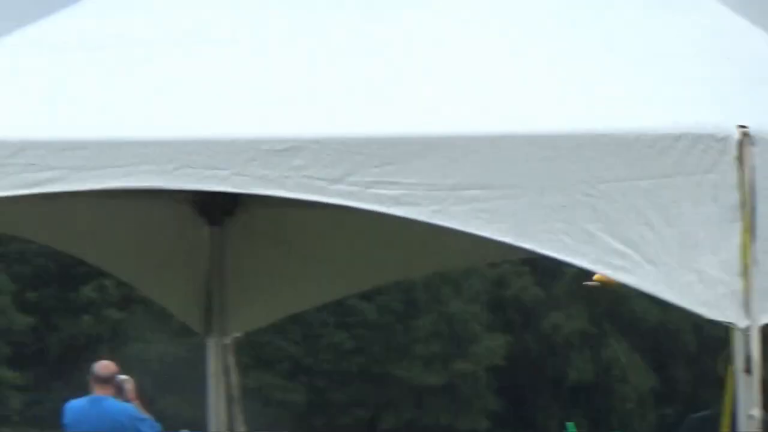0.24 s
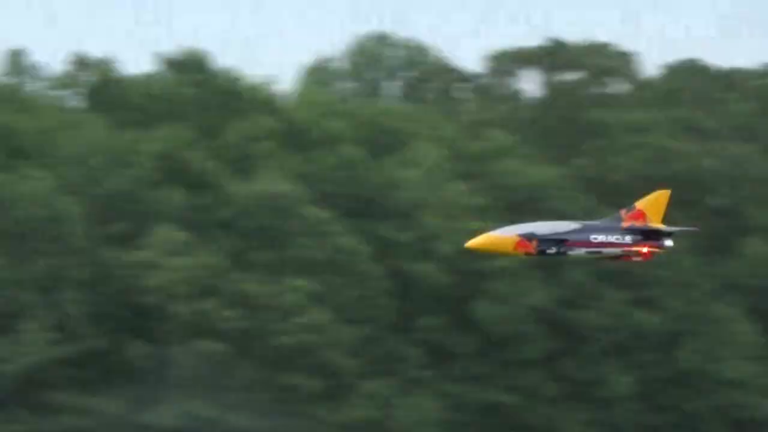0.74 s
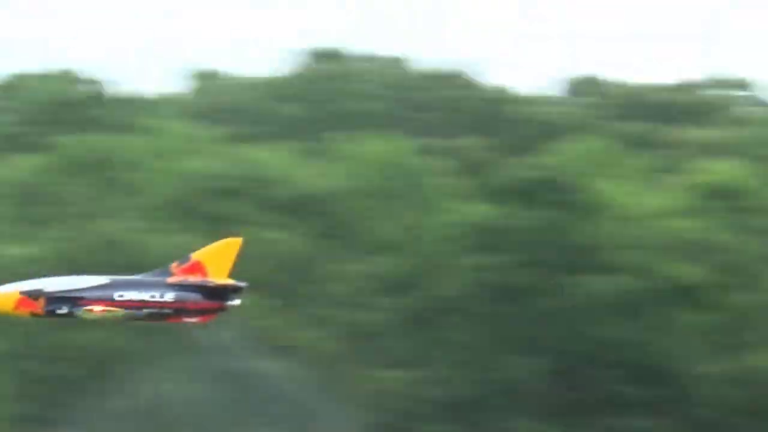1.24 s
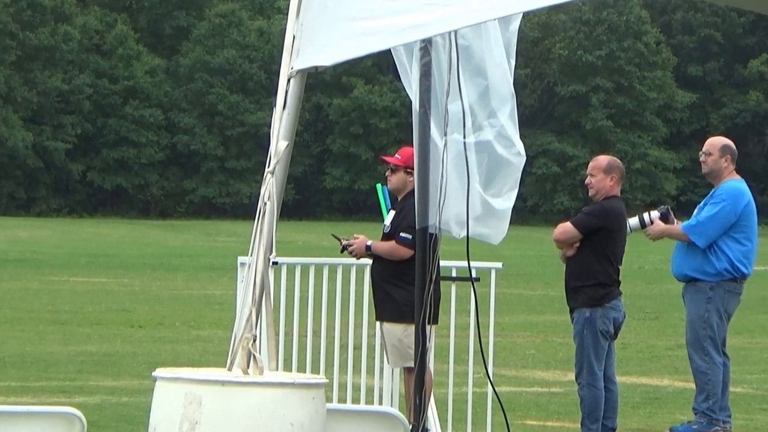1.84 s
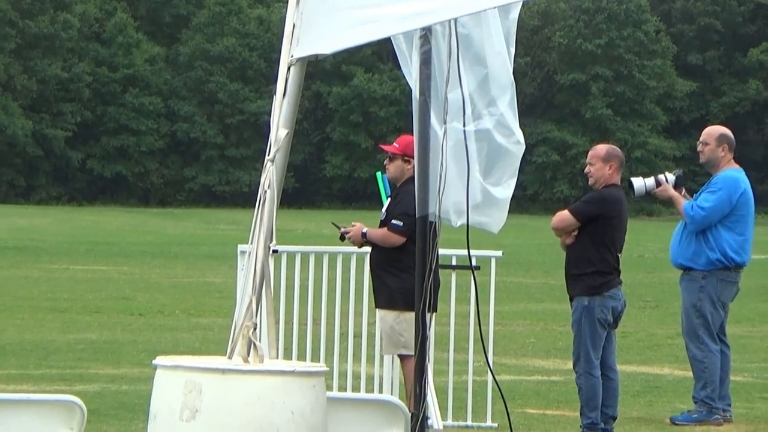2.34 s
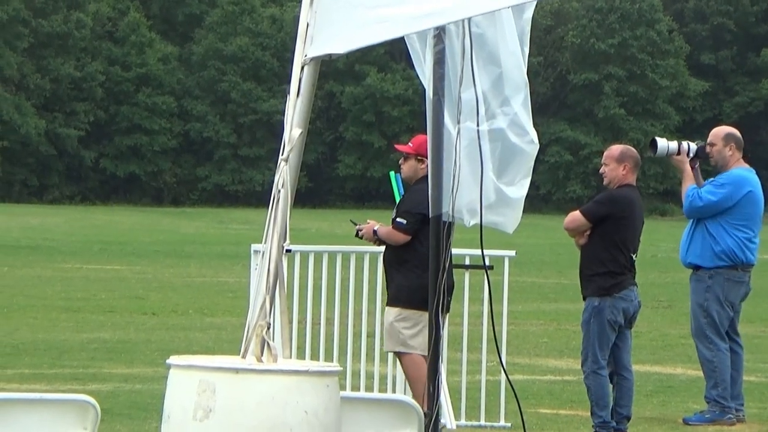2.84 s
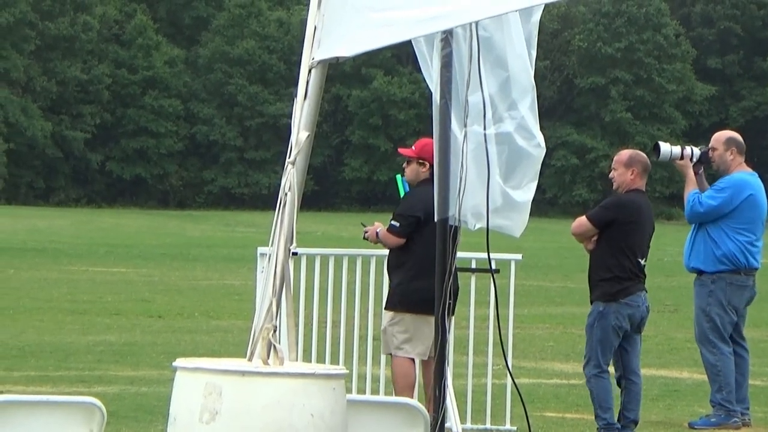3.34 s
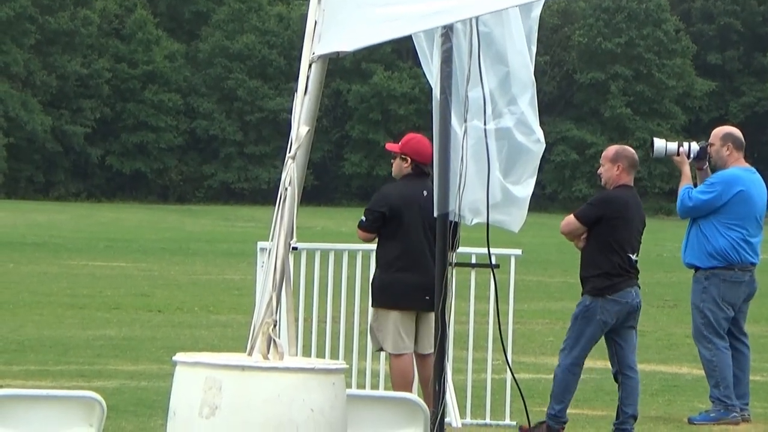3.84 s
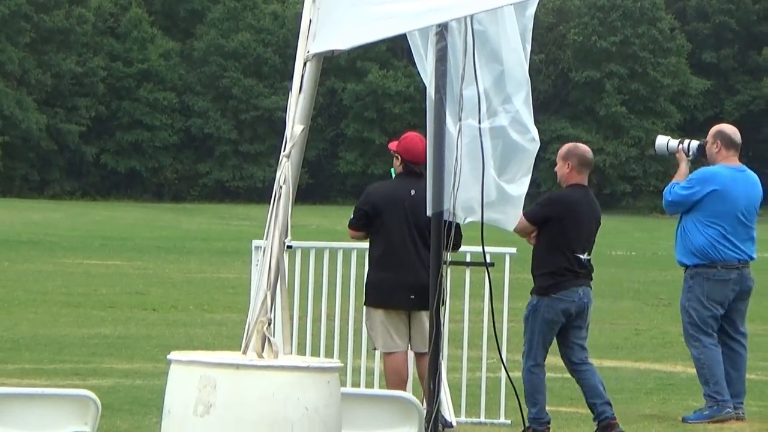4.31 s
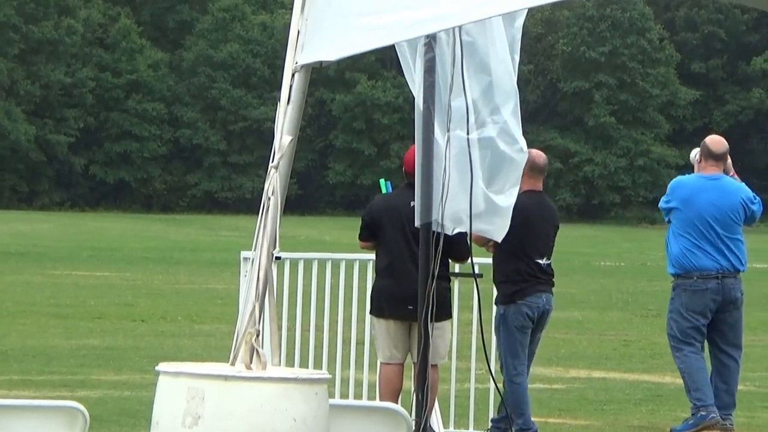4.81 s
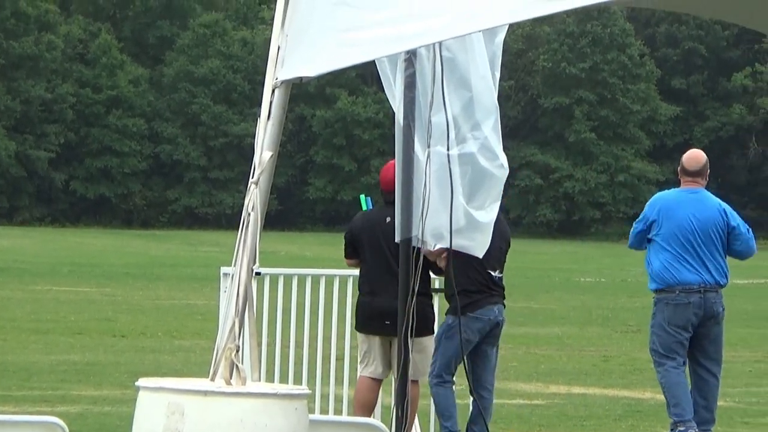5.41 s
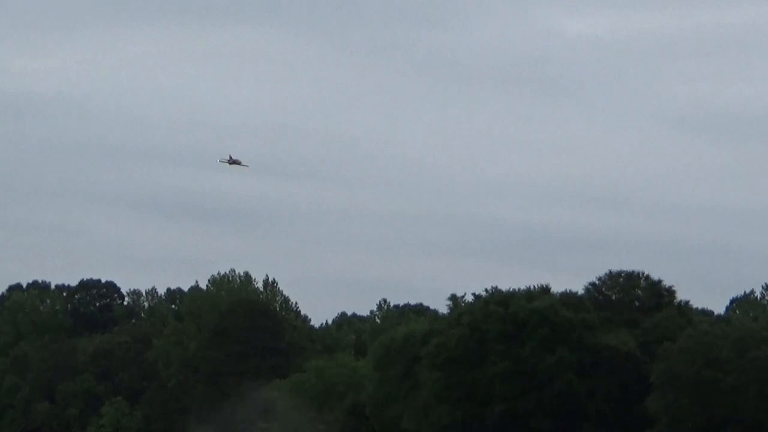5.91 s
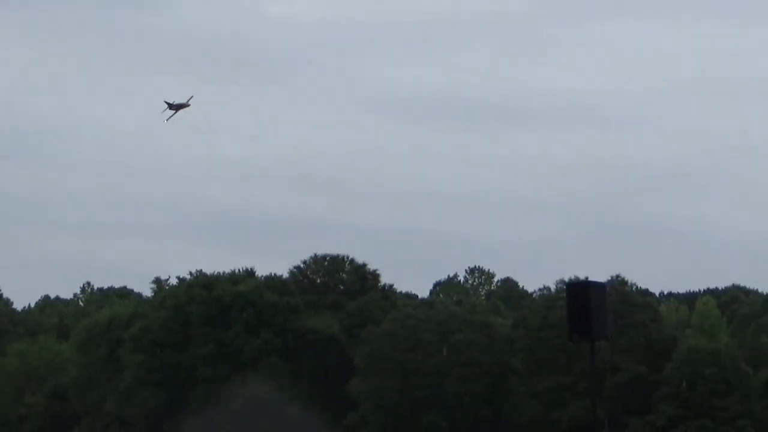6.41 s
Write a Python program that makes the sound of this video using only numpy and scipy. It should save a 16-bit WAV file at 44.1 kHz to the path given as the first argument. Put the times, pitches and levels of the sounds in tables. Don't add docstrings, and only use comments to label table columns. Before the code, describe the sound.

A radio-controlled jet rushes by with broad airy exhaust noise, a humming shaft tone and very high blade whine. The sound cuts briefly, with a tiny blip, then a fainter leftward approach builds into a second bright pass. Two shutter ticks come early in it. Finally the far jet climbs with steady wavering whistles, more ticks, and low wind rumble on the open-air microphone.

```python
import sys
import numpy as np
from scipy import signal
from scipy.fft import rfft, irfft, next_fast_len
from scipy.io import wavfile

SR = 44100
rng = np.random.default_rng(int(sys.argv[2]) if len(sys.argv) > 2 else 0)


def generate_wav(sig):
    pcm = np.round(np.clip(np.atleast_2d(sig).T, -1, 1) * 32767).astype(np.int16)
    wavfile.write(sys.argv[1], SR, pcm)


def makeup_ratio(level_db):
    decades = np.asarray(level_db, float) / 20
    return 10 ** decades


N = 293706
STEP = 32
SLOW_S = np.arange(0, N + STEP, STEP) / SR
FIRST_CUT_S = 1.3445
MACH = .19

# time_s, loudness_db, air_clearness_db, tail_towards_us_db
JET_LOW_PASS = [(0, -13, -11, -17), (.15, -16.5, -3.5, -18), (.28, -16, -7.5, -15), (.4, -17, -9, -8.5),
                (.49, -16, -6.5, -8), (.57, -21, -1.5, -8.5), (.75, -18, -4.5, -3), (1.0, -21.5, 0, -4),
                (1.343, -23, 3, -0.5)]
JET_APPROACH = [(1.366, -34, -18, -1.5), (2.48, -24.5, -18, -5), (3.06, -16.5, -17.5, -10.5),
                (3.61, -18.5, -12, -3.5), (3.9, -23.5, -3.5, -0.5), (4.5, -23.5, 1.5, -3),
                (4.95, -21, 3, -2.5), (5.21, -18, -3, -7), (5.76, -28, -6, 5.5)]
JET_CLIMB = [(5.764, -28, -11, 2.5), (5.92, -31.5, -6.5, 0), (6.1, -24.5, -7, -0.5), (6.3, -22.5, -11, -2),
             (6.42, -20.5, -6.5, -6), (6.5, -22.5, -10, -4), (6.655, -23.5, -7, -3.5)]
# time_s, level_db
INTAKE_FACING = [(0, -3), (.7, 1), (1.343, 4.5), (1.366, -8), (2.5, 0), (3.7, 6.5), (4.4, -4.5), (4.9, 0.5),
                 (5.76, 0), (5.764, -3), (6.655, -3.5)]
# time_s, left_over_right_db
BEARING = [(0, -.5), (.4, -2.5), (.9, -2), (1.34, -0.5), (1.39, 9.5), (3.5, 11.5), (4.45, 9), (4.97, .6),
           (5.3, .2), (5.76, -4.5), (5.764, 2.5), (6.66, 3)]
ROAR_CENTRES_HZ = [750, 2200, 4800, 9500, 13000]
# pitch_hz, level_db (per Hz)
ROAR_COLOUR = [(280, -38), (480, -4.5), (863, -1.5), (938, -2.5), (1660, 0.5), (5520, -10.5), (6910, -16.5),
               (9390, -10), (11100, -15), (13500, -25)]
# time_s, extra_path_ms, strength (0-1)
GRASS_BOUNCE = [(0, 0.41, 0), (.65, 0.48, 0.32), (.8, .49, 0.66), (1.1, 0.58, 0.46), (1.35, .54, .5),
                (1.39, 1.37, 0.4), (2.0, 1.24, .3), (2.5, 1.15, 0.13), (3.5, .86, .6), (4.2, .625, .72),
                (4.55, .62, .75), (4.72, .53, .72), (4.95, .535, .7), (5.3, .69, .55), (5.75, 0.836, 0.18),
                (5.77, 1.2, 0.6), (6.2, 1.19, 0.47), (6.66, 1.19, 0.48)]
# pitch_hz, turn_rad
GRASS_TURN = [(900, 1.59), (3300, 2.07)]
# pitch_hz, share (0-1)
PAN_SHARE = [(300, 0.66), (600, 0.33), (1000, 0.75), (1700, 0.7), (3000, 0.97), (4500, 0.93), (6000, 0),
             (7500, 0)]
# pitch_hz, unrelated_side_db
SPREAD = [(40, -16), (150, -29), (500, -20), (1500, -25.5), (3300, -17.5), (5000, -19), (7000, -10),
          (9000, -22.5), (14000, -28)]
# pitch_hz, lag_rad, extra_lag_rad (per half dB of pan beyond 10.5 dB)
LEFT_LAG = [(40, 0, 0), (300, 0.44, -2.5), (1000, 0.28, 0.2), (2400, 0.3, 0), (3300, 0.056, 0),
            (4080, 0.13, 3.7), (6070, 0, 12), (8450, 0, -4.5), (11000, 0.3, -3.5)]
# time_s, level_db, deep_over_level_db
RUMBLE_LEVELS = [
    [(0, -44.5, -4), (.6, -35, -12), (1.0, -40, -4), (1.34, -43, -6)],
    [(1.41, -41, -3), (2.1, -39, -5), (2.7, -35, -5), (3.4, -36.5, -12), (4.15, -38.5, -15),
     (4.67, -46, -11), (5.1, -43.5, -15), (5.47, -39.5, -18), (5.75, -38.5, -8)],
    [(5.77, -36.5, -3), (6.16, -35, -9), (6.45, -38, -5), (6.655, -36.5, -10)],
]
# pitch_hz, level_db (per Hz)
RUMBLE_COLOUR = [(12, -46), (20, -40), (43, -3.5), (108, -4), (192, 3), (274, -10.5), (336, -1),
                 (407, -3.5), (520, 0), (680, -30), (1140, -120)]
# start_s, end_s, pitch_at_rest_hz, peak_db, ends_below_peak_db
SHAFT_TONES = [
    [(0, .48, 722, -33, 3), (.68, 1.34, 718, -34, 4)],
    [(2.65, 3.3, 733, -27.5, 11), (3.3, 3.88, 733, -30.5, 7), (3.9, 4.36, 731, -30, 6)],
]
# closest_s, time_to_fly_closest_distance_s
PASSES = [
    (1.35, .58),
    (4.39, .67),
]
# start_s, end_s, pitch_at_rest_hz, peak_db, ends_below_peak_db
BLADE_TONES = [
    (.9, 1.345, 15440, -33, 4),
    (3.93, 4.58, 14900, -41.5, 2.5),
]
# closest_s,
# time_to_fly_closest_distance_s
BLADE_PASSES = [
    (1.05, .5),
    (4.2, .65),
]
# start_s, end_s, whine_db, rise_db_per_s, fall_db_per_s
INTAKE_SWEEPS = [
    (1.0, 1.3, -35.5, 23, 2000),
    (4.0, 4.55, -37.5, 53, 130),
]
# time_s, peak_db, left_over_right_db
SHUTTERS = [
    (1.683, -27, 8),
    (1.8896, -27, -4),
    (5.8546, -20, 7),
    (5.8855, -27, -5),
    (6.3824, -24, 6),
]
# start_s, end_s, pitch_hz, peak_db, ends_below_peak_db
WHISTLES = [
    (2.05, 2.55, 2060, -35, 18),
    (5.765, 6.66, 994, -38.5, 1),
    (5.765, 5.92, 1548, -33, 4),
    (5.92, 6.56, 1672, -25.5, 14),
    (5.92, 6.2, 2490, -35, 4),
    (6.2, 6.55, 2488, -30, 9),
]


def in_time(rows):
    s, *columns = np.transpose(rows)
    return [np.interp(SLOW_S, s, column) for column in columns]


def full(slow):
    return np.interp(np.arange(N) / STEP, np.arange(len(slow)), slow)


def at_hz(points, hz, axis=1):
    points = np.array(points)
    return np.interp(np.log(hz), np.log(points[:, 0]), points[:, axis])


def rms_one(x):
    return x / np.sqrt(np.mean(x ** 2) + 1e-20)


def drift(rate_hz):
    r = np.exp(-2 * np.pi * STEP * rate_hz / SR)
    settle = 2000
    noise = rng.standard_normal(len(SLOW_S) + settle)
    return rms_one(signal.lfilter([1], [1, -2 * r, r * r], noise)[settle:])


def bands(low_hz, high_hz, count):
    edges = np.geomspace(low_hz, high_hz, count + 1)
    return [(signal.butter(2, [a, b], "band", fs=SR, output="sos"), np.sqrt(a * b))
            for a, b in zip(edges, edges[1:])]


def placed(sound, stray, hz, pan_db):
    lean = np.tanh(at_hz(PAN_SHARE, hz) * pan_db * np.log(10) / 40)
    loose = makeup_ratio(at_hz(SPREAD, hz) + 1.0 * np.abs(pan_db))
    far_pan_db = np.maximum(pan_db - 10.5, 0) * 2
    lag_rad = at_hz(LEFT_LAG, hz) + at_hz(LEFT_LAG, hz, axis=2) * far_pan_db
    lagging = np.tan(np.clip(lag_rad, 0, 2) / 2)
    return np.array([sound, full(lean) * sound + full(loose) * stray, full(lagging) * sound])


def off_grass(x):
    extra_ms, strength = map(full, in_time(GRASS_BOUNCE))
    extra_ms = extra_ms * (1 + .012 * full(drift(7.0)))
    size = next_fast_len(N)
    hz = np.fft.rfftfreq(size, 1 / SR)
    turn = np.exp(-1j * at_hz(GRASS_TURN, hz + 1))
    dulling = np.sqrt(1 + (hz / 6000) ** 4)
    turned = irfft(rfft(x, size) * turn / dulling, size)[:N]
    late = np.interp(np.arange(N) - extra_ms * SR / 1000, np.arange(N), turned)
    strength = np.clip(strength * (.85 + .18 * full(drift(5.0))), 0, .9)
    return (x + strength * late) / np.sqrt(1 + strength ** 2)


def roar(pan_db, *levels_db):
    swing_db = [c - 10 * np.log10(np.mean(makeup_ratio(c) ** 2)) for c in levels_db]
    white = [[off_grass(w) for w in pair] for pair in rng.standard_normal((2, 2, N))]
    eddies = 0.69 * drift(9.8) + 0.65 * drift(75.0)
    out = 0
    for k, (sos, hz) in enumerate(bands(488.5, 13800, count=20)):
        place = np.interp(np.log(hz), np.log(ROAR_CENTRES_HZ), np.arange(len(levels_db)))
        low = min(int(place), 3)
        level_db = swing_db[low] + (place - low) * (swing_db[low + 1] - swing_db[low])
        flutter_db = (0.057 + 0.43 * place) * eddies + 1.68 * drift(19.3) + 1.0 * drift(4.7)
        gain = full(makeup_ratio(at_hz(ROAR_COLOUR, hz) + level_db + flutter_db))
        out = out + placed(*signal.sosfilt(sos, white[k % 2]) * gain, hz, pan_db)
    return makeup_ratio(-19) * out / np.std(out[0])


def rumble():
    upper_db, deep_db = in_time(sum(RUMBLE_LEVELS, []))
    white = rng.standard_normal((2, 2, N))
    out = 0
    for k, (sos, hz) in enumerate(bands(17.5, 503, count=10)):
        level_db = upper_db + deep_db * np.clip(np.log(110 / hz) / 0.2, 0, 1)
        level_db = level_db - 10 * np.log10(np.mean(makeup_ratio(level_db) ** 2))
        gain = full(makeup_ratio(at_hz(RUMBLE_COLOUR, hz) + level_db + 2.0 * drift(10.0)))
        out = out + placed(*signal.sosfilt(sos, white[k % 2]) * gain, hz, 0 * upper_db)
    return makeup_ratio(-36) * out / np.std(out[0])


def glide(row, flown=None):
    start, end, hz, peak_db, ends_db = row
    s = np.linspace(start, end, num=40)
    ahead = (s - flown[0]) / flown[1] if flown else 0 * s
    heard_hz = hz / (1 + MACH * ahead / np.sqrt(1 + ahead ** 2))
    arch = (2 * (s - start) / (end - start) - 1) ** 2
    return np.transpose([s, heard_hz, peak_db - ends_db * arch])


def tone(rows, pan_db, waver_db, wobble):
    hz, level_db = in_time(rows)
    fade = np.clip(np.minimum(SLOW_S - rows[0][0], rows[-1][0] - SLOW_S) / 0.02, 0, 1)
    wave = np.sin(2 * np.pi * np.cumsum(full(hz * (1 + wobble * drift(25.4)))) / SR)
    wave = np.sqrt(2) * wave * full(fade * makeup_ratio(level_db + waver_db * drift(14.0)))
    return placed(wave, 0, rows[0][1], pan_db)


def shaft_tones(pan_db):
    return sum(tone(glide(row, flown), pan_db, waver_db=2.5, wobble=.005)
               for swells, flown in zip(SHAFT_TONES, PASSES) for row in swells)


def haze(pan_db, gain):
    sos = signal.butter(4, [12600, 15700], "band", fs=SR, output="sos")
    noise = rms_one(signal.sosfilt(sos, rng.standard_normal((2, N))))
    sound, stray = noise * full(gain * makeup_ratio(1.4 * drift(9.0)))
    return placed(sound, stray, 14000, pan_db)


def intake_beam():
    gain = 0
    for start, end, db, rise, fall in INTAKE_SWEEPS:
        level_db = db - rise * np.maximum(start - SLOW_S, 0) - fall * np.maximum(SLOW_S - end, 0)
        same_part = (SLOW_S < FIRST_CUT_S) == (start < FIRST_CUT_S)
        gain = gain + makeup_ratio(level_db) * same_part
    return gain


def blade_tones(pan_db):
    return sum(tone(glide(row, flown), pan_db, waver_db=3, wobble=.003)
               for row, flown in zip(BLADE_TONES, BLADE_PASSES))


def first_cut(t):
    leftover = .13 * np.exp(-np.maximum(t - FIRST_CUT_S, 0) / .0035)
    blip = 1.8 * ((t > 1.3748) & (t < 1.3788))
    fade_in = np.interp(t, [1.3788, 1.384, 1.394], [.012, .06, 1])
    return np.where(t < FIRST_CUT_S, 1, leftover + blip + fade_in)


def shutters():
    out = np.zeros((2, N))
    t = np.arange(300) / SR
    for s, peak_db, pan_db in SHUTTERS:
        tick = rng.standard_normal(len(t)) * np.exp(-t / 0.0013) * makeup_ratio(peak_db - 9)
        first = round(s * SR)
        out[:, first:first + len(t)] += tick * makeup_ratio([[pan_db / 2], [-pan_db / 2]])
    return signal.sosfilt(signal.butter(2, 6000, "high", fs=SR, output="sos"), out)


def whistles(pan_db):
    return sum(tone(glide(row), pan_db, waver_db=2.5, wobble=.005) for row in WHISTLES)


def thump():
    start_s, pitch_hz, peak_db, die_60_db_s = 2.43, 103, -24, .3
    t = np.maximum(np.arange(N) / SR - start_s, 0)
    swell = 1 - np.exp(-t / 0.011)
    return makeup_ratio(peak_db - 60 * t / die_60_db_s) * swell * np.sin(2 * np.pi * pitch_hz * t)


def scene():
    loud_db, clear_db, tail_db = in_time(JET_LOW_PASS + JET_APPROACH + JET_CLIMB)
    (pan_db,), (nose_db,) = in_time(BEARING), in_time(INTAKE_FACING)
    rasp_db = loud_db + 1 * clear_db - 0.55 * nose_db
    hiss_db = loud_db + 1.164 * clear_db + nose_db
    top_db = hiss_db + 0.54 * clear_db
    outside_beam = makeup_ratio(loud_db + 1.5 * clear_db + nose_db - 36)
    total = roar(pan_db, loud_db + tail_db, loud_db, rasp_db, hiss_db, top_db)
    total += rumble()
    total += shaft_tones(pan_db)
    total += haze(pan_db, intake_beam() + outside_beam)
    total += blade_tones(pan_db)
    total += whistles(pan_db)
    mid, side, lagging = total
    size = next_fast_len(N)
    side = side + irfft(-1j * rfft(lagging, size), size)[:N]
    microphone_hiss = makeup_ratio(-66) * rng.standard_normal(N)
    return np.array([mid + side, mid - side]) + shutters() + thump() + microphone_hiss


def band_limit(x):
    return signal.sosfilt(signal.butter(12, 15800, fs=SR, output="sos"), x)


def record(dry):
    t = np.arange(N) / SR
    offset = -.05 * ((t > 1.3446) & (t < 1.3679))
    joined = dry * first_cut(t) + offset
    return band_limit(1.1 * np.tanh(joined / 1.1))


dry = scene()
out = record(dry)
generate_wav(out)
```